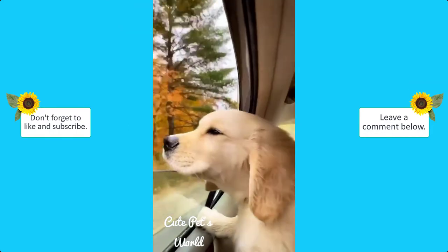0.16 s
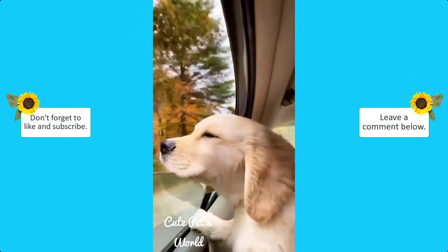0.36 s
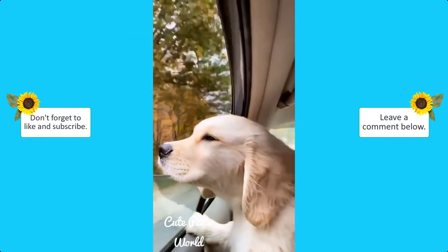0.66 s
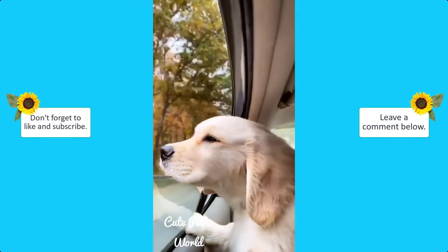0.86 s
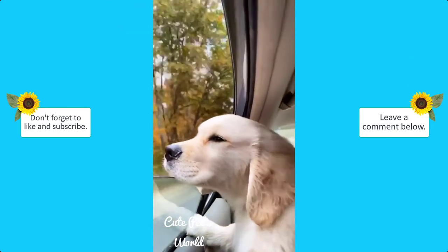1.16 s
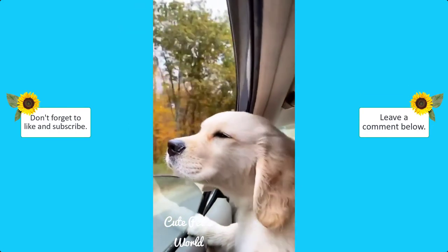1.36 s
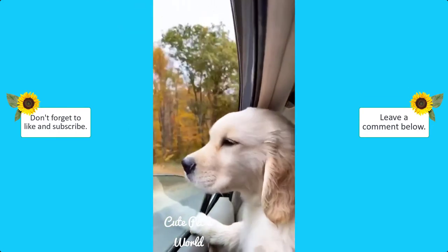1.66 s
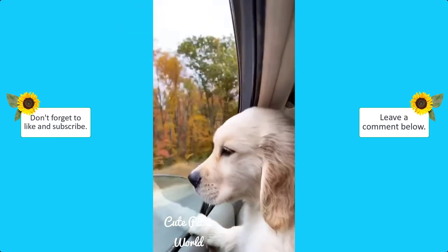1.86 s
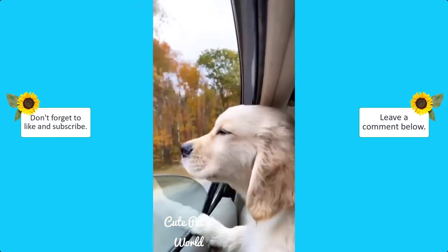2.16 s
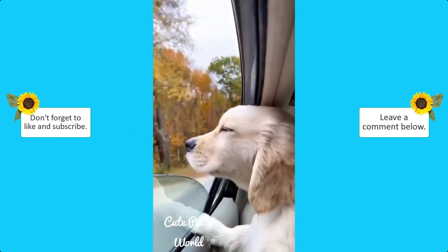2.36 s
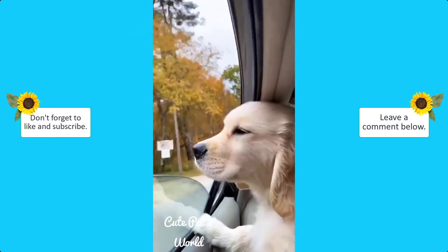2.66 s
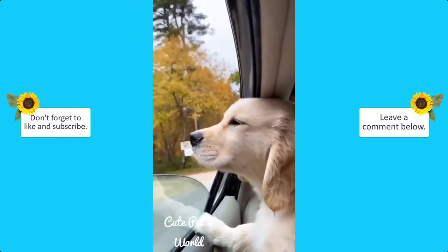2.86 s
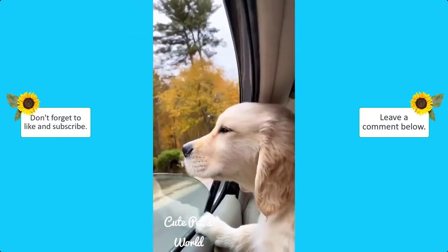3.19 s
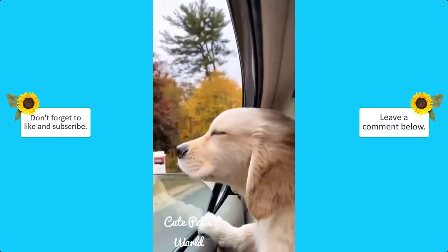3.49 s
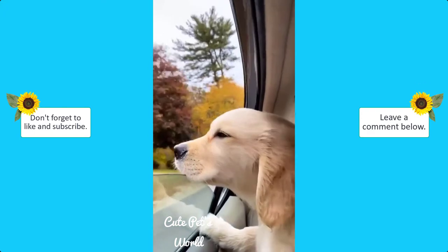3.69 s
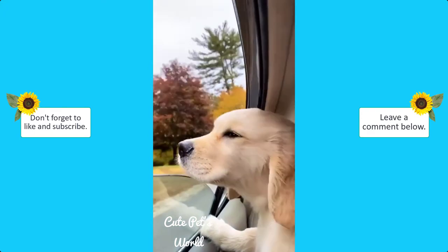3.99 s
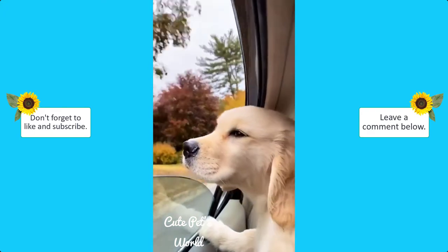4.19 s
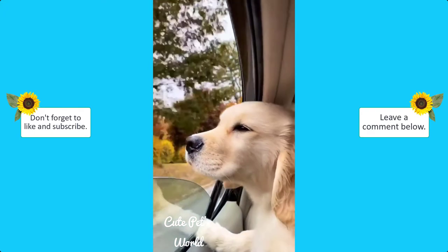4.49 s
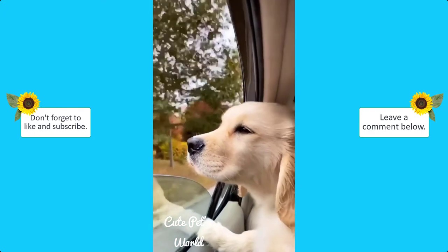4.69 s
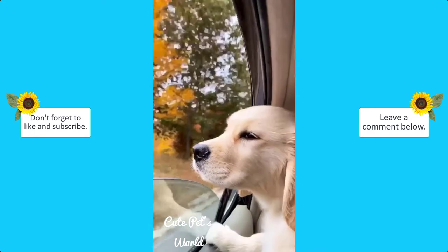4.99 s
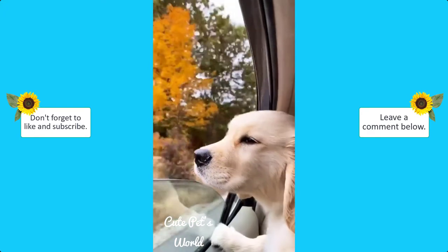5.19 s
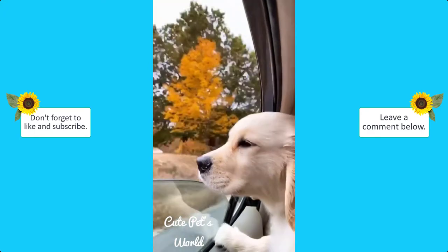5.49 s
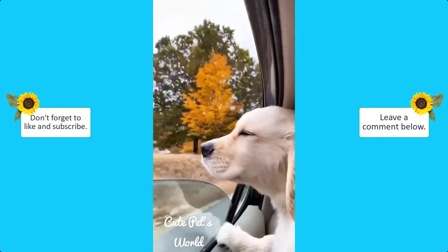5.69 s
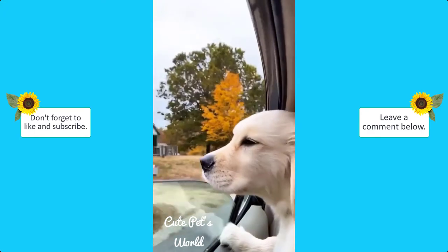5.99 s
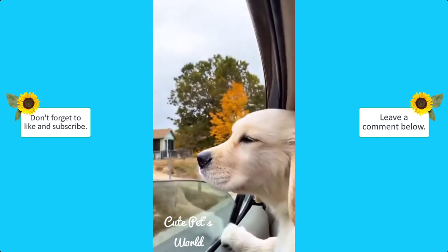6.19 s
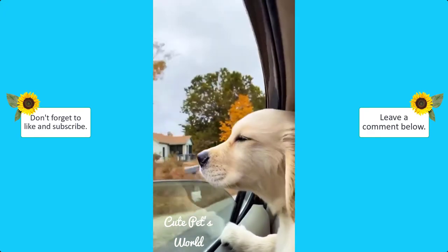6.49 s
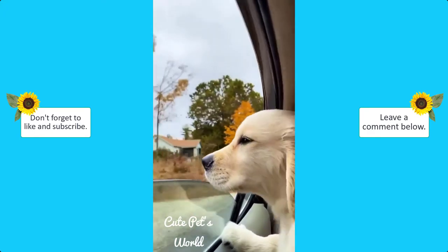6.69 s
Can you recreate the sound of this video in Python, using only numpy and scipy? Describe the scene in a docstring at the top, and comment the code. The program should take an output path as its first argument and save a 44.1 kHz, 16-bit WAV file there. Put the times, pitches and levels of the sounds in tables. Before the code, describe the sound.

Close beside an open car window while driving: a deep, pulsing air boom dominates over road roar, soft tyre rush and faint wind hiss. Near two seconds a short hollow whoosh with a rough hoot swells, drops slightly in pitch and ends in soft bumps. A plastic snap comes at three seconds; tiny creaks near six and a dry rattling knock near the end.

```python
"""The cabin air of a moving car throbs at an open side window, as eddies pump its low resonance.
Shaped turbulent noise gives the road roar, tyre rush and wind hiss; narrow resonators make the tyres sing.
Once a hollow whoosh of resonant noise, with a rough hoot inside, swells, sinks in pitch and ends in soft bumps.
Impulsively driven modes make the trim tick and creak, a fitting snap and a loose panel knock;
swells of grainy noise make faint rustles and the breathy end of the whoosh."""
import sys
import numpy as np
from scipy import signal
from scipy.fft import rfft, irfft, next_fast_len
from scipy.io import wavfile
from scipy.ndimage import uniform_filter1d, map_coordinates

SR = 44100
rng = np.random.default_rng(int(sys.argv[2]) if len(sys.argv) > 2 else 0)


def inscribe(sig):
    """Save sig as 16-bit PCM at rate SR to the path in sys.argv[1].

    A 1-D sig is mono; a 2-D sig holds one channel per row.
    Samples are clipped to [-1, 1] before scaling.
    """
    pcm = np.round(np.clip(np.atleast_2d(sig).T, -1, 1) * 32767)
    wavfile.write(sys.argv[1], SR, pcm.astype(np.int16))


N = 302085  # length [samples]


def amp(db):
    """Decibel law: a level in dB becomes an amplitude gain."""
    return 10 ** (np.asarray(db) / 20)


def unit(x):
    """Normalisation of power: x scaled to rms 1."""
    return x / np.sqrt(np.mean(x ** 2) + 1e-20)


def curves(rows):
    """Linear interpolation: one value per sample for each column after the time."""
    s, *columns = np.transpose(rows)
    t = np.arange(N) / SR
    return [np.interp(t, s, column) for column in columns]


def wobble(rate):
    """Band-limited random fluctuation: a smooth curve through `rate` random knots a second."""
    knots = rng.standard_normal(int(N * rate / SR) + 4)
    return map_coordinates(knots, [np.arange(N) * rate / SR])


def filtered(x, response):
    """Linear filtering: the spectrum of x times a complex response of frequency."""
    m = next_fast_len(len(x) + 8192)  # padding leaves room for the ringing
    spectrum = rfft(x, m) * response(np.fft.rfftfreq(m, 1 / SR))
    return irfft(spectrum, m)[:len(x)]


def resonances(modes, f):
    """Modal superposition: damped resonators (Hz, width Hz, dB) summed with alternating sign."""
    total = 0
    for k, (centre, width, db) in enumerate(modes):
        damping = 1j * f * width
        total = total + (-1) ** k * amp(db) * damping / (centre * centre - f * f + damping)
    return total


def rush(spectrum, patchy_db):
    """Turbulent noise: random pressure with a given spectrum and flickering patches of gain, at rms 1."""
    z = signal.stft(rng.standard_normal(N), nperseg=512)[2]
    # smooth the gains over neighbouring frequencies, then over time
    field = uniform_filter1d(rng.standard_normal(z.shape), size=3, axis=0)
    field = uniform_filter1d(field, size=8, axis=1)
    noise = signal.istft(z * amp(patchy_db * unit(field)), nperseg=512)[1][:N]
    hz, db = np.transpose(spectrum)

    def shape(f):
        return amp(np.interp(np.log(f + 1), np.log(hz), db, left=-120, right=-120))

    return unit(filtered(noise, shape))


def bounded(air, steadiness):
    """Amplitude limitation: the flow bounds the swing of the air, so strong and weak cycles are evened out."""
    swing = np.sqrt(np.abs(uniform_filter1d(air ** 2, size=1500)) + 1e-6)
    return unit(air / swing ** np.clip(steadiness, 0, 1))


# levels along the drive, before gusts:
# (time [s], cabin boom level [dB], road roar level [dB], wind hiss level [dB])
DRIVE = [(0, -28, -32, -51.5), (0.3, -24, -31.5, -53.5), (1.1, -27.5, -33.5, -54.5), (1.7, -25.5, -33, -53),
         (2.35, -27, -32.5, -54.5), (2.6, -30.5, -30, -52.5), (3.0, -24, -31.5, -52.5),
         (3.4, -25, -31.5, -53.5), (3.95, -24, -31.5, -52), (4.45, -23.5, -32, -51.5),
         (4.9, -29.5, -32, -52.5), (5.3, -27, -31.5, -53), (5.65, -23.5, -32, -51.5),
         (6.45, -25.5, -32, -53), (6.85, -25, -33, -51)]
# how deeply the boom throbs: (time [s], depth [0-1])
THROB = [(0, 0.65), (2.3, 0.8), (2.9, 0.25), (5.3, 0.13), (6.0, 0.37)]
# the heaviest eddies: (time [s], boom level at their height [dB])
SURGES = [(.33, -19), (.59, -19.5), (.725, -19), (.92, -20.5), (1.21, -16), (1.645, -20.5), (1.72, -17.5),
          (1.88, -22.5), (2.07, -21.5), (2.35, -19), (2.9, -21.5), (3.61, -20.5), (3.71, -21),
          (3.95, -16.5), (4.42, -20), (4.51, -23), (5.15, -23), (5.6, -21), (5.87, -17.5), (6.43, -19),
          (6.69, -20.5), (6.79, -18.5)]
# spectrum of the deep buffeting: (frequency [Hz], relative density [dB per Hz])
BUFFET_SPECTRUM = [(10, -18), (17, -4), (25, 2), (32, -4), (41, -2.5), (48, 9), (60, -26), (90, -39)]
# spectrum of the cabin's air resonance: (frequency [Hz], relative density [dB per Hz])
CABIN_SPECTRUM = [(38, -29), (52, -12), (64, 0), (76, 3.5), (91, -5), (108, -8), (130, -19), (200, -31)]
PUMP_RATE = 8.3  # nominal eddy rate [1/s]; a whole number fits between heavy ones
PUMP_SCATTER = 0.18  # how far an eddy strays from its turn [cycles]
SURGE_S = 0.019  # time from a surge's height to 1/e of its pull [s]


def cabin(buffet_db=-30.5, gust_db=-0.5):
    """Helmholtz resonance: eddies at the window pump the cabin air, over a deeper buffeting."""
    boom_db, _, _ = curves(DRIVE)
    depth = np.clip(curves(THROB)[0], 0, 1)
    t = np.arange(N) / SR

    # lighter eddies are spaced between the heavy ones
    heavy = np.array([-1 / PUMP_RATE] + [s for s, _ in SURGES] + [t[-1] + 1 / PUMP_RATE])
    between = np.maximum(1, np.round(np.diff(heavy) * PUMP_RATE))
    eddies = np.interp(t, heavy, np.cumsum(np.r_[0, between])) + PUMP_SCATTER * wobble(7.6)

    # the divisor keeps the mean power whatever the depth
    pump = (1 + depth * np.cos(2 * np.pi * eddies)) / np.sqrt(1 + depth ** 2 / 2)
    level = pump * amp(boom_db + gust_db * wobble(19))
    for s, db in SURGES:
        level = level + (amp(db) - level) * np.exp(-((t - s) / SURGE_S) ** 2)

    boom = level * bounded(rush(CABIN_SPECTRUM, patchy_db=-1.0), steadiness=0.66)
    buffeting = bounded(rush(BUFFET_SPECTRUM, patchy_db=-1.0), steadiness=0.23)
    return boom + amp(buffet_db) * buffeting


# tyre rush, changing with the asphalt, before gusts: (time [s], level [dB])
ASPHALT = [(0, -44.5), (.9, -44), (1.45, -42.5), (2.3, -43), (3.6, -44), (5.1, -44.5), (6.1, -44),
           (6.6, -42)]
# spectrum of the road roar: (frequency [Hz], relative density [dB per Hz])
ROAD_SPECTRUM = [(70, -5), (125, 0), (155, 1.5), (185, -3.5), (212, -3.5), (250, -7.5), (310, -7),
                 (365, -11), (420, -10.5), (540, -14.5), (620, -21.5), (900, -22.5), (1600, -87)]
# spectrum of the tyre rush: (frequency [Hz], relative density [dB per Hz])
TYRE_SPECTRUM = [(400, 0.5), (620, 3), (800, 0.5), (930, 0), (1140, -3), (1430, -2.5), (1730, -2.5),
                 (2000, -5.5), (2350, -13.5), (3300, -21), (6000, -56)]
# spectrum of the wind hiss: (frequency [Hz], relative density [dB per Hz])
HISS_SPECTRUM = [(1500, -34), (2500, 5), (3600, 4.5), (4200, 3), (4700, 0.5), (5300, 1.5), (6200, -0.5),
                 (7400, 1.5), (8800, -3.5), (11000, -5), (13000, -8.5), (14500, -36)]


def drive(tyre_gust_db=0.62, hiss_gust_db=0.33, flutter_db=0.58):
    """Broadband radiation: road roar through the body, tyre rush through the window, wind at its frame."""
    _, road_db, hiss_db = curves(DRIVE)
    tyre_db, = curves(ASPHALT)
    gust = wobble(6.6)  # shared by tyres and wind
    road = amp(road_db) * bounded(rush(ROAD_SPECTRUM, patchy_db=1.0), steadiness=0.2)
    tyres = amp(tyre_db + tyre_gust_db * gust) * rush(TYRE_SPECTRUM, patchy_db=1.5)
    hiss_level = amp(hiss_db + hiss_gust_db * gust + flutter_db * wobble(40))
    hiss = hiss_level * rush(HISS_SPECTRUM, patchy_db=1.9)
    return road + tyres + hiss


# bands in which the tyres sing: (frequency [Hz], half the width of each resonator [Hz])
TREAD = [(315, 45), (1020, 24), (1480, 95), (1709, 28)]
# their levels along the road: (time [s], then the level of each band in turn [dB])
TREAD_LEVELS = [(0, -50, -61, -49.5, -61), (.6, -44.5, -56, -53, -58), (1.3, -42, -62, -55, -57),
                (2.4, -41, -60, -57, -56.5), (3.3, -44, -54, -60, -54.5), (4.8, -49, -57, -56.5, -55.5),
                (5.6, -52, -54, -69, -52), (5.9, -47, -56, -67, -54.5), (6.3, -51, -53, -63, -49.5),
                (6.5, -49, -55, -66, -55), (6.85, -44.5, -56, -55, -56)]


def tread(waver=.004):
    """Resonant excitation: tread blocks slap the asphalt and sing in wavering bands that trade strength."""
    out = np.zeros(N)
    travel = np.cumsum(1 + waver * wobble(9))
    for (hz, width), db in zip(TREAD, curves(TREAD_LEVELS)):
        # squaring the response passes the noise through the resonator twice
        song = filtered(rng.standard_normal(N), lambda f: resonances([(hz, 2 * width, 0)], f) ** 2)
        song = map_coordinates(song, [travel], mode="mirror")
        out += amp(db) * bounded(unit(song), steadiness=0.64)
    return out


# strength of the whoosh, before flutter: (time [s], level [dB])
WHOOSH = [(1.45, -58), (1.64, -46.5), (1.75, -44), (1.79, -39.5), (1.85, -39), (1.93, -45), (1.975, -62)]
# its resonances, before the pitch glides: (frequency [Hz], width [Hz], level [dB])
HOLLOW = [(764, 140, -4.5), (1210, 150, -4.5), (1690, 240, -4), (2100, 320, -8), (2980, 900, -16.5),
          (5000, 7900, -29.5)]
WHOOSH_S, PASS_S = 1.89, 0.066  # when it goes by, and the time scale of its fall in pitch [s]
DOPPLER = .015  # its pitch sinks from this share above to this share below


def whoosh(grain_db=1.0, flutter_db=1.0, waver=.035):
    """Doppler shift: the hollow resonances of a swelling rush of air sink in pitch as it goes by."""
    t = np.arange(N) / SR
    db, = curves(WHOOSH)
    ratio = 1 - DOPPLER * np.tanh((t - WHOOSH_S) / PASS_S) + waver * wobble(70)
    air = filtered(rng.standard_normal(N), lambda f: resonances(HOLLOW, f))
    # reading the noise faster or slower shifts its pitch
    gliding = unit(map_coordinates(air, [np.cumsum(ratio)], mode="wrap"))
    level = amp(db + grain_db * wobble(220) + flutter_db * wobble(80))
    return level * gliding * (t > WHOOSH[0][0]) * (t < WHOOSH[-1][0])


# a hoot that builds inside the whoosh and breaks off: (time [s], frequency before jitter [Hz], level [dB])
HOOT = [(1.6, 794, -62), (1.76, 791, -44), (1.82, 802, -42), (1.86, 795, -42), (1.885, 770, -34),
        (1.91, 744, -45), (1.95, 749, -70)]


def hoot(fuzz_rate=120, jitter=0.0351):
    """Random modulation of a carrier: a rough, broken band of air whose pitch drops as it ends."""
    hz, db = curves(HOOT)
    t = np.arange(N) / SR
    fuzz = wobble(fuzz_rate) + 1j * wobble(fuzz_rate)  # random amplitude and phase
    turns = np.cumsum(hz * (1 + jitter * wobble(110))) / SR
    song = bounded(np.real(fuzz * np.exp(2j * np.pi * turns)), steadiness=0.6)
    return amp(db) * song * (t > HOOT[0][0]) * (t < HOOT[-1][0])


# hollow bumps as the whoosh ends: (time [s], level before rise and decay [dB], frequency [Hz])
BUMPS = [(1.886, -27, 560), (1.927, -35, 567)]


def bumps(rise=.003, t60=0.067):
    """Damped oscillation: each soft, hollow bump is one low mode that dies quickly."""
    out = np.zeros(N)
    for s, db, hz in BUMPS:
        t = np.maximum(np.arange(N) / SR - s, 0)
        envelope = amp(db - 60 * t / t60) * (1 - np.exp(-t / rise))
        out += envelope * np.sin(2 * np.pi * hz * t)
    return out


# what the trim rings with: (frequency [Hz], width [Hz], level before the knock weighting [dB])
TRIM = [(800, 640, 1.5), (1500, 970, 4.5), (2910, 510, -0.5), (4080, 740, 1), (5640, 460, -1.5),
        (7060, 800, 0.5), (8800, 700, 0.5), (9600, 950, -1), (11100, 950, -1), (12800, 2300, -5)]


def slip(knock_db, t60, rise=0.00039, tail_db=-19, tail_t60=0.065, tail_hz=4000,
         knock_hz=3200, knock_gain_db=9):
    """Modal excitation: a tiny scrape rings the trim, and the cabin adds a short, dull tail."""
    t = np.arange(SR // 12) / SR

    def below(f, hz):
        return 1 / (1 + (f / hz) ** 4)

    onset = 1 - np.exp(-(t / rise) ** 2)
    scrape = onset * amp(-60 * t / t60) * rng.standard_normal(len(t))
    tail = onset * amp(tail_db - 60 * t / tail_t60) * rng.standard_normal(len(t))
    push = scrape + filtered(tail, lambda f: below(f, tail_hz))

    def ringing(f):
        # knock_db sets the weight of the low modes
        return resonances(TRIM, f) * amp((knock_db + knock_gain_db) * below(f, knock_hz))

    tick = filtered(push, ringing)
    return tick / np.sqrt(uniform_filter1d(tick ** 2, size=130).max())  # loudest short-time rms is 1


# slips of the trim, alone or in creaking runs:
# (time [s], relative level [dB], low knock weight before its gain [dB], scrape t60 [s])
SLIPS = [(1.2564, -31, -13, 0.0093), (1.9302, -22, 0, 0.018), (5.589, -32, -15, .012),
         (5.606, -30, -14, .012), (5.8834, -31, -11, .009), (5.8938, -25.5, -8, .009),
         (5.9066, -32, -11, .008), (5.9182, -27.5, -24, 0.011), (5.972, -25.5, -14, .009),
         (5.9864, -30.5, -13, 0.012), (5.9974, -32, -8, .011), (6.0105, -29, -18, .009),
         (6.026, -28.5, -21, .012), (6.5363, -27, -20, 0.0088), (6.547, -37, -12, .014),
         (6.5886, -23, -6, 0.007), (6.6354, -35, -7, .01), (6.706, -30, -12, .009),
         (6.714, -29.5, -9, .014)]


def creaks(trim_db=-9):
    """Stick-slip friction: the trim sticks and slips, each slip with its own weight and length."""
    out = np.zeros(N + SR)
    for s, db, knock_db, t60 in SLIPS:
        tick = amp(db + trim_db) * slip(knock_db, t60)
        out[round(s * SR):][:len(tick)] += tick
    return out[:N]


# a loose panel knocks and rebounds: (time [s], peak level [dB])
KNOCKS = [(6.778, -17.5), (6.7887, -20), (6.8103, -25)]
# what the panel rings with: (frequency [Hz], width [Hz], relative level [dB])
PANEL = [(700, 350, -5), (1400, 300, 5.5), (1930, 550, 4), (2820, 290, 3), (4000, 1300, -14),
         (7260, 600, -7), (8300, 700, -11), (10600, 1500, -12)]
PANEL_TOP_HZ = 11900  # upper limit of the knock's sound [Hz]


def knocks(scrape_db=-20, scrape_t60=0.014):
    """Impulse response: each knock is one dry blow on the panel's modes, with a brief scrape after it."""
    out, t = np.zeros(N + SR), np.arange(SR // 20) / SR

    def ringing(f):
        return sum(resonances([mode], f) for mode in PANEL) * (f < PANEL_TOP_HZ)

    for s, db in KNOCKS:
        scrape = amp(scrape_db - 60 * t / scrape_t60) * rng.standard_normal(len(t))
        blow = filtered((t == 0) + scrape, ringing)
        out[round(s * SR):][:len(t)] += amp(db) * blow / np.abs(blow).max()
    return out[:N]


# what the fitting rings with: (frequency [Hz], relative level [dB], t60 [s])
FITTING = [(1090, -12, .04), (1610, -3.5, .04), (1760, -3, .025), (1980, -3, 0.035), (2440, -9, .025),
           (2790, -9.5, 0.043), (3830, -12, .03), (4286, 0, 0.03), (4560, -4, 0.012), (5740, -5.5, .016),
           (7040, -8, .02), (8020, -3, .014), (9150, -7, .016), (10700, -6, .011), (11300, -3, 0.012)]
# the fitting chatters as it seats: (time after the snap [s], level relative to SNAP_DB [dB])
CHATTER = [(0, 1), (.0021, -3), (.005, -9), (.0155, -13)]
SNAP_S, SNAP_DB = 3.0777, -25.5  # time [s] and reference level [dB] of the snap


def snap(ring_db=-7, crack_db=-6, crack_t60=0.014, rise=0.00026, crack_top_hz=13200):
    """Transient modal decay: a plastic fitting snaps and chatters in short cracks and damped modes."""
    t = np.arange(SR // 10) / SR
    out = np.zeros(N)
    for delay, weight_db in CHATTER:
        ring = 0
        for hz, db, t60 in FITTING:
            ring = ring + amp(db - 60 * t / t60) * np.sin(2 * np.pi * (hz * t + rng.random()))
        noise = filtered(rng.standard_normal(len(t)), lambda f: f < crack_top_hz)
        crack = amp(crack_db - 60 * t / crack_t60) * noise
        envelope = amp(SNAP_DB + weight_db) * (1 - np.exp(-t / rise))
        out[round((SNAP_S + delay) * SR):][:len(t)] += envelope * (amp(ring_db) * ring + crack)
    return out


# soft rustles, and the breathy 2 kHz end of the whoosh:
# (time [s], level before grain [dB], standard deviation of the swell [s], centre frequency [Hz])
NOISE_SWELLS = [(.69, -57.5, 0.047, 7500), (1.92, -47, 0.018, 2200), (2.695, -53, 0.021, 3400),
                (4.068, -55.5, 0.045, 7500), (5.905, -50, 0.018, 7000), (6.552, -58, .015, 2800),
                (6.793, -48, 0.022, 2100)]


def noise_swells(octaves=0.8, grain_db=2.0):
    """Amplitude modulation of band-limited noise: brief grainy swells."""
    out, t = np.zeros(N), np.arange(N) / SR
    grain = unit(amp(grain_db * wobble(500)))
    for s, db, length, hz in NOISE_SWELLS:
        band = lambda f: np.exp(-(np.log2((f + 1) / hz) / octaves) ** 2)
        swell = np.exp(-((t - s) / length) ** 2 / 2)
        out += amp(db) * swell * unit(filtered(rng.standard_normal(N), band))
    return grain * out


def scene():
    """Superposition: the pressures of all sources add at one microphone beside the window."""
    vehicle = cabin() + drive() + tread()
    passing = whoosh() + hoot() + bumps()
    fittings = creaks() + knocks() + snap()
    return (vehicle + passing + fittings + noise_swells())[None]


TOP_HZ = 13950  # upper band limit [Hz]


def record(dry):
    """Band limitation: nothing above TOP_HZ is kept."""
    return np.array([filtered(x, lambda f: f < TOP_HZ) for x in dry])


dry = scene()
out = record(dry)
inscribe(out)
```